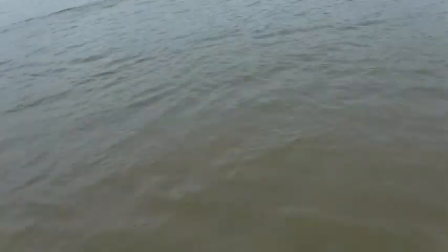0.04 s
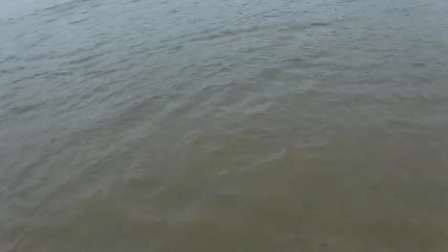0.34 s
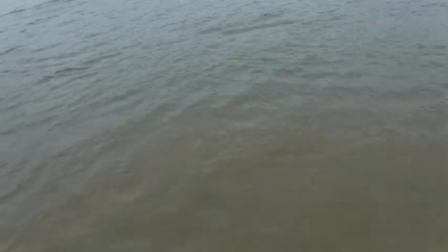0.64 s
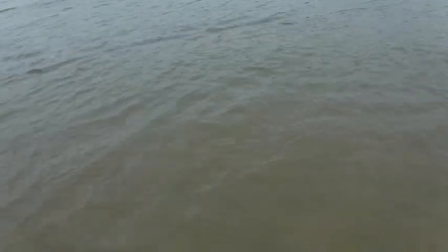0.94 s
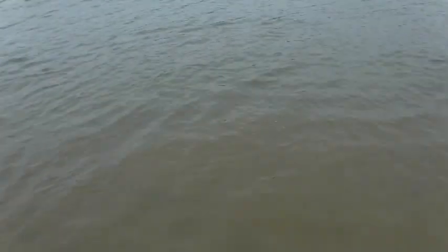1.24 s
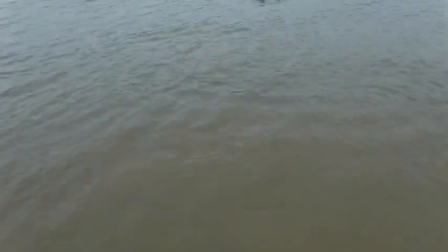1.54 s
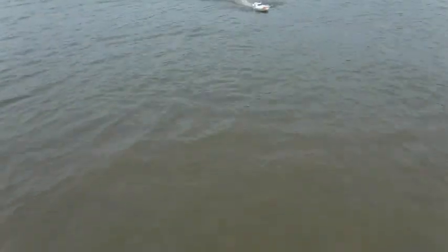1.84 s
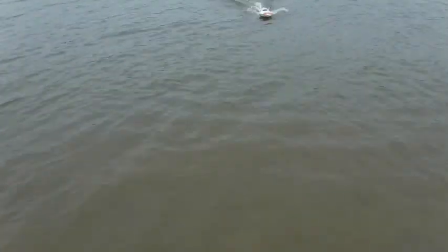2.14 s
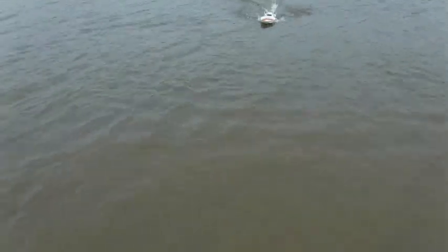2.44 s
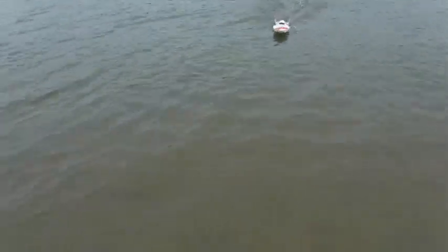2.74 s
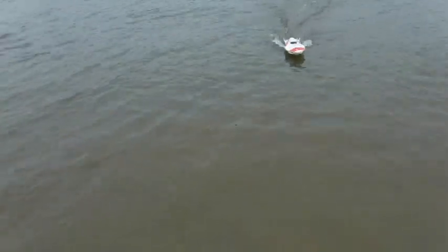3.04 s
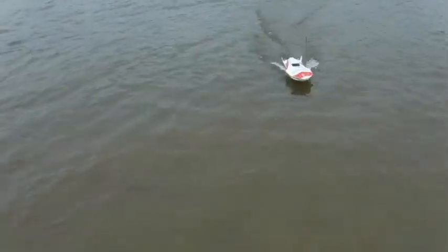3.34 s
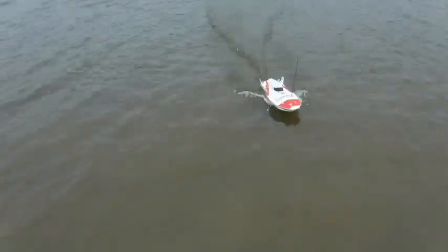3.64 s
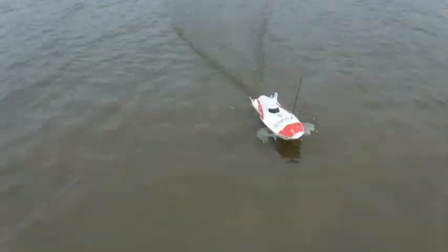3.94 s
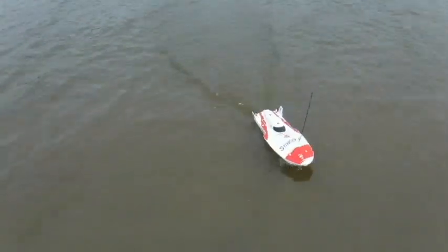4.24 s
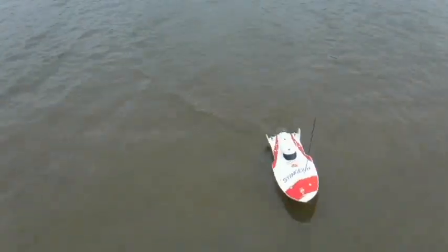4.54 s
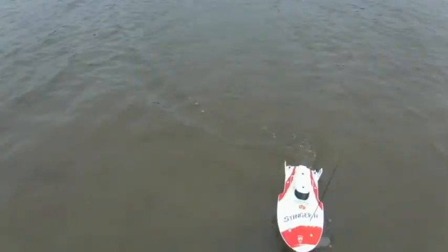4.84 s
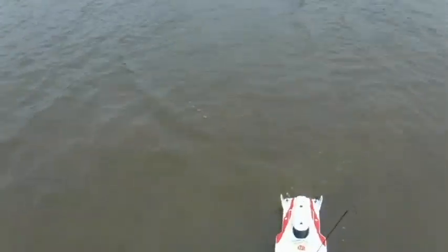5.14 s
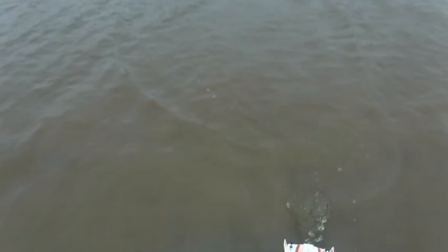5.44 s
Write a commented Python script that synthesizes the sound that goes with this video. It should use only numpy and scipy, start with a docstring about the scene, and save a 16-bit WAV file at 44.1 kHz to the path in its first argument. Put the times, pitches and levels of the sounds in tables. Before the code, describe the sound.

For the first second, wind rumbles and thumps on the microphone, dying away by about 1.5 seconds. Beneath it a toy electric boat runs in across a lake, its small motor whining at a steady pitch and rattling through the plastic hull. It wavers in loudness and grows gradually nearer, with soft bubbling and a few thin ticks of spray. A sharp, close plastic click comes at 2.2 seconds. At 3.3 seconds the motor cuts out with a brief propeller churn, and the boat coasts among small, distinct drops and a couple of faint clicks. A short throttle burst with rasping gears comes from 4.4 to 4.6 seconds, with another loud plastic click near its end. More drips follow, then a second, raspier burst from 5 to 5.4 seconds. A faint distant rumble and the hiss of ripples continue throughout.

```python
"""Wind buffets the microphone at first, as a toy electric boat runs in across a lake towards the shore.
Its motor whines and rattles through the plastic hull, growing louder, and the bow wave bubbles.
At 2.2 s comes the first of a few close clicks of hard plastic. At 3.3 s the throttle is let go:
the propeller churns, the boat coasts and single drops stand out. Near 4.4 s and 5 s it gets
two short bursts of throttle, and its gears rasp under the load."""
import sys
import numpy as np
from scipy import signal
from scipy.fft import rfft, irfft, next_fast_len
from scipy.io import wavfile
from scipy.ndimage import uniform_filter1d

SR = 44100
rng = np.random.default_rng(int(sys.argv[2]) if len(sys.argv) > 2 else 0)


def transcribe(u):
    """Save the signal u as a 16-bit wav file named by the first command-line argument.

    u: samples, shape (n,) or (channels, n), limited to [-1, 1]; the rate is SR.
    q: integer samples, one column per channel.
    """
    v = np.clip(np.atleast_2d(u).T, -1, 1)
    q = np.round(v * 32767).astype(np.int16)
    wavfile.write(sys.argv[1], SR, q)


N = 242373
T = np.arange(N) / SR
TOP_HZ = 15900
RUN_OFF_S = 3.325  # the throttle is let go, ending the run in

# How fast the shaft turns on the run in. Each row: time in seconds, turns per second.
SPEED = [(0.0, 108.6), (0.17, 110), (1.08, 108.7), (1.27, 110.0), (1.37, 108.4), (1.41, 110.6),
         (1.83, 109.1), (1.85, 108.1), (2.09, 110), (2.32, 109.8), (2.38, 111), (3.3, 111.6)]
# The motor grows as the boat nears and swells as the hull pitches.
# Each row: time in seconds, motor gain in dB, extra treble gain in dB.
APPROACH = [(0.02, -46, -3), (0.12, -42.5, -7.5), (0.17, -48.5, -1), (0.2, -42, -5.5), (0.24, -44.5, -5),
            (0.4, -46.5, 0.5), (0.46, -45.5, -6.5), (0.49, -44, -5.5), (0.64, -46, -1.5), (0.67, -43, -7.5),
            (0.81, -47, -1.5), (1.04, -45, -0.5), (1.06, -43.5, -6.5), (1.22, -40.5, -6),
            (1.28, -44.5, -2.0), (1.37, -42, -2), (1.47, -43, -5.5), (1.56, -40, -5.5), (1.69, -44, -1.5),
            (1.72, -41, -4.5), (1.87, -42, -0.5), (1.97, -42.5, -4), (2.08, -45.0, 0.5), (2.15, -39.5, -4),
            (2.19, -42.5, -3.5), (2.34, -42.5, 0.5), (2.4, -40.5, -3.5), (2.49, -41.5, 1), (2.59, -40.5, 3),
            (2.68, -41.5, -1), (2.73, -38, -0.5), (2.8, -41.5, -1.0), (2.87, -36.5, -6), (2.91, -41, 2),
            (2.94, -37, -5), (3.01, -39.5, 3.5), (3.06, -36.5, -2), (3.09, -39, 2), (3.23, -37, -2),
            (3.3, -35.5, -2.0)]
# Bursts of throttle by the shore. Each row: start and end in seconds, turns per second
# the shaft first aims for, motor gain in dB, extra treble gain in dB.
BURSTS = [(4.369, 4.605, 102.6, -36, 0.5), (5.047, 5.387, 101.5, -36, 2.5)]
# How well the hull gives off each pitch. Each row: frequency in Hz, then gains in dB
# for the far whine, far rattle, close whine and close rattle.
HULL = [(110, -31, -50, -14, -49), (299, -8.5, -50, -9.5, -67), (670, -30, -52, -31.5, -58),
        (1337, -25, -48, -23.5, -40.5), (1795, -11, -34.5, -14.5, -36), (2113, -14.5, -40.5, -20.5, -39),
        (2830, -33, -53.5, -31, -40), (3300, -18, -42.5, -20, -44.5), (3940, -19, -39, -22.5, -42),
        (4430, -20.5, -41, -21.5, -45), (4700, -21.5, -41, -22.5, -40), (5770, -16.5, -39, -19, -43),
        (6360, -25, -51, -21.5, -52), (7910, -37.5, -48, -31.5, -56), (8500, -34, -65.5, -36, -68),
        (11050, -41.5, -60, -42.5, -70), (15500, -64, -84, -68, -87)]


def undb(db):
    """Turn decibels into a number to multiply by."""
    return 10 ** (np.asarray(db) / 20)


def unit(x):
    """Scale a sound to an average power of 1."""
    return x / np.sqrt(np.mean(x ** 2))


def curve(rows, column=1):
    """Join one column of a table with straight lines over time."""
    rows = np.array(rows, float)
    return np.interp(T, rows[:, 0], rows[:, column])


def spectrum(hz, rows, column=1):
    """Look up the gain at these frequencies in a table of Hz and dB."""
    rows = np.array(rows, float)
    return undb(np.interp(np.log(hz + 1e-9), np.log(rows[:, 0]), rows[:, column]))


def colour(x, rows, column=1):
    """Shape a sound's lows and highs with a table of Hz and dB."""
    size = next_fast_len(N)
    gain = spectrum(np.fft.rfftfreq(size, 1 / SR), rows, column)
    return irfft(rfft(x, size) * gain, size)[:N]


def band(x, lo_hz, hi_hz, order=2):
    """Keep the part of a sound between two frequencies."""
    return signal.sosfilt(signal.butter(order, [lo_hz, hi_hz], "band", fs=SR, output="sos"), x)


def walk(per_s):
    """Wander at random, by about 1 either side of zero."""
    points = rng.standard_normal(4096)
    return np.sqrt(3 / 2) * np.interp(T * per_s, np.arange(len(points)), points)


def bump(x, centre, width):
    """A bell shape of height 1."""
    return np.exp(-.5 * ((x - centre) / width) ** 2)


def fade(t, fade_s):
    """Die away by 60 dB every fade_s seconds."""
    return np.exp(-np.log(1000) * t / fade_s)


def add(out, start_s, x, peak_db):
    """Mix in a short sound."""
    i = int(np.clip(start_s * SR, 0, N - 1))
    out[i:i + len(x)] += (undb(peak_db) * x / np.abs(x).max())[:N - i]


def shore(level_db=-47.5):
    """Distant rumble and the even hiss of ripples over open water."""
    # The tone of the open shore. Each row: frequency in Hz, relative level in dB.
    shore_tone = [(15, -41), (30, -3), (60, 4.5), (100, -4), (240, -5), (400, -11.5), (700, -16.5),
                  (970, -16), (2170, -28.5), (3500, -37), (5100, -28), (7000, -32.5), (9000, -35.5),
                  (15500, -37.5)]
    breeze = undb(.6 * walk(5))
    return undb(level_db) * breeze * unit(colour(rng.standard_normal(N), shore_tone))


def wind(die_db_per_s=16, gust_trim_db=-1.5, buffet_trim_db=-2, sputter_db=4.0):
    """Swirls of air rumble, sputter and thump at the microphone, then die away."""
    # The strength of the breeze. Each row: time in seconds, level in dB before the trim.
    gusts = [(0, -34.5), (.22, -25.5), (.29, -33.5), (.38, -26), (.56, -24), (.84, -30.5), (1.08, -32.5),
             (1.26, -47)]
    # The tone of the rumble. Each row: frequency in Hz, relative level in dB.
    wind_tone = [(15, -6), (32, -3), (70, 0), (130, -3), (200, -6.5), (320, -15.5), (500, -28), (900, -45),
                 (3000, -86)]
    # Sharp thumps of air. Each row: time in seconds, level in dB before the trim,
    # upper edge in Hz, half length in seconds.
    buffets = [(0.097, -14.5, 104, 0.0066), (0.25, -17, 270, 0.0021), (0.321, -18.5, 232, 0.004),
               (0.521, -17.5, 365, 0.0084), (0.651, -30.5, 390, 0.0096), (1.005, -34, 490, 0.003),
               (1.643, -37.5, 98.9, 0.023)]
    level_db = curve(gusts) - die_db_per_s * np.maximum(T - gusts[-1][0], 0)
    sputter = rng.standard_normal(N) * undb(sputter_db * walk(60.32))
    swirls = unit(colour(sputter, wind_tone))
    swirls /= np.sqrt(uniform_filter1d(swirls ** 2, size=4000) + 0.037)  # even out slow swells
    out = undb(level_db + gust_trim_db) * swirls
    for s, db, hz, half_s in buffets:
        thump = unit(band(rng.standard_normal(N), hz / 4, hz, order=3))
        out += undb(db + buffet_trim_db) * bump(T, s, half_s) * thump
    return out


def bubble(hz, cycles, glide=0.059):
    """A small air pocket rings briefly and rises in pitch."""
    age = np.arange(int(cycles / hz * SR) + 2) / SR * hz / cycles  # runs from 0 to 1
    ring = np.sin(2 * np.pi * cycles * age * (1 + glide * age / 2))
    return ring * np.exp(-np.log(100) * age) * (1 - np.exp(-age * 25))


def bow_wave(close_spread_db=4, far_spread_db=3, fizz_db=-6):
    """The bow stirs up many tiny bubbles, a fine fizz and a few clear drops."""
    # Water stirred by the hull. Each row: time in seconds, level of the bubbles in dB.
    wash = [(0, -52), (3.0, -53.5), (3.4, -55), (3.58, -55.5), (4.0, -57.5), (4.17, -53), (4.31, -64.5),
            (5.0, -62), (5.5, -46.5)]
    # The clearest drops. Each row: start in seconds, peak level in dB, pitch in Hz.
    clear_drops = [(3.391, -33, 5410), (3.5175, -35, 4720), (3.6253, -38, 5140), (3.674, -53, 898),
                   (3.6933, -35, 3520), (3.749, -39, 5000), (3.815, -41.5, 2560), (3.87, -46, 1100),
                   (3.8927, -40, 2500), (3.9522, -44, 2290), (3.9932, -37, 950), (4.117, -43.5, 2470),
                   (4.174, -45.5, 2120), (4.1966, -44, 2060), (4.228, -36.5, 1970), (4.2566, -34, 6450),
                   (4.741, -41, 1000), (4.77, -44, 1150), (4.86, -47, 2190), (4.896, -43, 1770),
                   (4.9937, -40.5, 5370), (5.023, -42, 1940)]
    bubbles, drops = np.zeros(N), np.zeros(N)
    for when, pitch, size, length in rng.random(size=(4000, 4)):
        s, hz = when * N / SR, 1000 + 6000 * pitch ** 1.3
        spread_db = close_spread_db if s > RUN_OFF_S else far_spread_db  # far bubbles blur together
        size_db = -spread_db * np.log(size + 1 / 50)
        add(bubbles, s, bubble(hz, cycles=12 * (.5 + length)), size_db + 6 * np.log10(hz / 1000))
    for s, db, hz in clear_drops:
        add(drops, s, bubble(hz, cycles=24), db)
    spatter = undb(2.5 * walk(40))
    fizz = unit(band(rng.standard_normal(N), 1900, 5400) * spatter)
    return undb(curve(wash)) * (unit(bubbles) + undb(fizz_db) * fizz) + drops


def spray():
    """Spray makes thin ticks, each a short burst of hiss."""
    # Each row: start in seconds, peak level in dB, rough pitch in Hz, fade time in seconds.
    ticks = [(0.591, -33.5, 7540, 0.014), (1.848, -28.5, 6800, 0.067), (2.8682, -24.5, 5624, 0.012),
             (3.209, -20.5, 6450, 0.016)]
    out, t = np.zeros(N), T[:2048]
    for s, db, hz, fade_s in ticks:
        hiss = rng.standard_normal(len(t)) * fade(t, fade_s)
        add(out, s, band(hiss, hz * 0.64, hz * 1.055), db)
    return out


def plastic_clicks(scrape=0.32, low_hz=600):
    """A snap with a very short scrape sets hard plastic ringing."""
    # Clicks close by. Each row: start in seconds, peak level in dB, scrape length in seconds,
    # extra gain in dB for the notes below low_hz.
    clicks = [(2.2186, -4.5, 0.00074, 4), (3.9324, -26.5, 0.00044, -2), (4.2131, -23.5, 0.00025, -1),
              (4.5517, -6.5, 0.0021, -1), (4.9106, -32.5, 0.0022, -4)]
    # The notes the plastic rings with. Each row: pitch in Hz, relative level in dB, fade time in seconds.
    notes = [(366, -17.5, 0.019), (536, -14.5, 0.026), (685, -8.5, 0.021), (940, -11, 0.027),
             (1070, -9, 0.028), (1643, -3.5, 0.013), (2103, -6, 0.015), (2434, -4.5, 0.0065),
             (2916, -4.5, 0.006), (3570, -15, 0.041), (4630, 4.5, 0.0078), (5790, -3.5, 0.012),
             (6000, -2.5, 0.0083), (7020, -9.5, 0.0084), (8020, -12.5, 0.0068), (9980, -22, 0.012)]
    out, t = np.zeros(N), T[:2048]
    for s, db, scrape_s, low_db in clicks:
        ring = 0
        for k, (hz, note_db, fade_s) in enumerate(notes):
            gain = (-1) ** k * undb(note_db + low_db * (hz < low_hz))
            ring += gain * np.sin(2 * np.pi * hz * t) * fade(t, fade_s)
        push = band(scrape * rng.standard_normal(len(t)) * np.exp(-t / scrape_s), 1450, TOP_HZ)
        push[0] += 2  # the snap
        add(out, s, signal.fftconvolve(push, ring)[:len(t)], db)
    return out


def gear_ticks(delay_s=0.3, peak_db=-35, rise_db_per_s=200):
    """The gears tick once for each burst: a short hiss that swells and stops dead."""
    out, t = np.zeros(N), T[:2048]
    for start_s, *_ in BURSTS:
        hiss = rng.standard_normal(len(t)) * undb(rise_db_per_s * t)
        add(out, start_s + delay_s, band(hiss, 1500, 5000), peak_db)
    return out


def propeller_churn(froth_db=-9, far_db=-6):
    """The propeller slips, shaking the hull and frothing, after the run in and as bursts start and end."""
    def slip(s, db, half_s):
        return undb(db) * bump(T, s, half_s)

    def let_go(s, db):
        return slip(s + 0.045, db - 6, half_s=0.021)

    strength = let_go(RUN_OFF_S, APPROACH[-1][1] + far_db)
    for start_s, end_s, _, db, _ in BURSTS:
        strength += slip(start_s + 0.062, db - 2.2, half_s=0.025) + let_go(end_s, db)
    shake = unit(band(rng.standard_normal(N), 170, 420))
    froth = unit(band(rng.standard_normal(N), 870, 1080))
    return strength * (shake + undb(froth_db) * froth)


def gear_rasp(hz, phase, width_hz=270, grit_db=-8, knock=0.37, stray=0.37, flutter_db=2):
    """Gear teeth grate unevenly: a cluster of unsteady tones, and grit that pulses once a turn."""
    # The rasp bends up and down with the effort. Each row: time in seconds, centre in Hz, level in dB.
    effort = [(4.36, 4810, -85), (4.402, 4876, -50), (4.456, 5090, -48), (4.535, 5300, -44),
              (4.575, 5200, -37), (4.605, 4910, -34), (4.64, 4540, -40.5), (4.69, 4500, -57),
              (4.8, 4700, -82), (5.04, 5090, -77), (5.078, 5200, -36), (5.136, 5256, -38.5),
              (5.19, 5300, -37), (5.245, 5220, -30), (5.31, 5180, -32.5), (5.365, 5000, -36.5),
              (5.412, 4950, -39.5), (5.48, 4817, -56)]
    centre_hz = curve(effort)
    cluster = 0
    for k in range(42, 60):
        lag = 2 * np.pi * rng.random() + stray * walk(70)
        gain = bump(k * hz, centre_hz, width_hz) * undb(flutter_db * walk(30))
        cluster += gain * np.cos(k * phase + lag)
    cluster *= np.sqrt(2 * SPEED[0][1] / (np.sqrt(np.pi) * width_hz))  # power near 1 at full speed
    low_pass = signal.butter(3, 1.5 * width_hz, fs=SR, output="sos")
    grain = signal.sosfilt(low_pass, rng.standard_normal((2, N)))
    centre_phase = 2 * np.pi * np.cumsum(centre_hz) / SR
    hiss = grain[0] * np.cos(centre_phase) + grain[1] * np.sin(centre_phase)  # moved up to the centre
    grit = unit(hiss * (1 + knock * np.cos(phase)))
    return undb(curve(effort, column=2)) * (cluster + undb(grit_db) * grit)


def throttle(spin_up_s=.026, coast_s=.27, unload_s=0.0365, attack_s=0.031,
             climb_hz_per_s=11.5, unloaded_db=-4, fade_db_per_s=106):
    """Held, the throttle spins the shaft up fast; let go, the load drops and the shaft runs down."""
    full_hz, level_db, treble_db = curve(SPEED), curve(APPROACH), curve(APPROACH, column=2)
    since_on, since_off = T + 1, np.maximum(T - RUN_OFF_S, 0)  # already running at the start
    for start_s, end_s, hz, db, bright_db in BURSTS:
        now = T > start_s
        since_on[now] = T[now] - start_s
        since_off[now] = np.maximum(T[now] - end_s, 0)
        # As the boat picks up speed the propeller turns more easily.
        full_hz[now] = hz + climb_hz_per_s * (since_on - since_off)[now]
        level_db[now], treble_db[now] = db, bright_db
    spin = 1 - np.exp(-since_on / spin_up_s)
    shaft_hz = full_hz * spin * np.exp(-since_off / coast_s)
    grip = np.exp(-since_off / unload_s)
    load = spin ** 4 * grip
    release_db = unloaded_db * (1 - grip) - fade_db_per_s * since_off
    gain = (1 - np.exp(-since_on / attack_s)) * undb(level_db + release_db)
    return shaft_hz, load, gain, treble_db


def motor_whine(hz, phase, close, load, sway_db=2.7, flutter_db=3.0, scatter=2.65,
                rocking_per_s=6.5, ripples_per_s=22):
    """Tones at multiples of the shaft speed sway as the boat rocks and flutter as ripples slap it."""
    # Tones that stand out or cancel under load. Each row: multiple, far gain in dB, close gain in dB.
    accent_rows = [(2, 2, 0), (4, -3, 4.5), (8, 5.5, 8.5), (14, 4, 1), (15, 4.5, 5), (16, 5.5, 8),
                   (17, -3, -1.5), (18, 7, 8.5), (19, 1.5, 6.5), (21, 5.5, 11), (22, 2.5, 10.5),
                   (32, -0.5, 3.5), (34, 1.5, 1.5), (36, 1.5, 0), (38, 1.5, -4), (42, -2, -15), (43, 0, -8),
                   (46, 5, 0), (48, -7, -1), (49, 1, -2), (50, 2.5, -5), (52, -4, 2.5), (54, -10, -3),
                   (69, 13, 2), (71, 14, 4)]
    # The hull's two strongest resonances wander as it rocks. Each row: centre in Hz, width in Hz,
    # far gain in dB, close gain in dB, wander in Hz.
    resonances = [(1680, 150, 4, 6, 69), (5270, 200, -0.5, 5, 38)]
    accents = {round(k): (far_db, close_db) for k, far_db, close_db in accent_rows}
    step = 64  # samples between loudness updates
    t, hz, close, load = T[::step], hz[::step], close[::step], load[::step]
    peaks = []
    for centre_hz, width_hz, far_db, close_db, wander_hz in resonances:
        peak_hz = centre_hz + wander_hz * walk(rocking_per_s)[::step]
        peaks.append((peak_hz, width_hz, (1 - close) * far_db + close * close_db))
    angle = np.resize(phase % (2 * np.pi), (len(t), step)).astype(np.float32)
    out = np.zeros_like(angle)

    def drift(per_s):
        return np.interp(t * per_s, np.arange(512), rng.standard_normal(512))

    for k in range(1, 135):
        far_db, close_db = accents.get(k, (0, 0))
        if k % 2 == 0 and 32 <= k <= 54:  # the motor pulls twice a turn, lifting even treble tones
            far_db, close_db = far_db + 6, close_db + 7
        tone_hz = k * hz
        far_gain = spectrum(tone_hz, HULL, column=1) * undb(load * far_db)
        close_gain = spectrum(tone_hz, HULL, column=3) * undb(load * close_db)
        gain = (1 - close) * far_gain + close * close_gain
        gain *= undb(sum(db * bump(tone_hz, peak_hz, width_hz) for peak_hz, width_hz, db in peaks))
        gain *= undb(sway_db * drift(rocking_per_s) + flutter_db * drift(ripples_per_s))
        gain *= 1 + .3 * drift(60)  # a fast flicker
        # Low tones arrive more nearly together; high ones scatter over the turn.
        lag = scatter * np.clip(k / 24, 1, 2) * drift(3)
        out += np.float32(gain)[:, None] * np.cos(k * angle + np.float32(lag)[:, None])
    return np.sqrt(2) * out.ravel()[:N]


def motor(wobble=0.00153, close_wobble=0.0015, loose_wobble=0.02955, knock=0.36, loose_whine=.18,
          loose_rattle_db=6, whine_trim_db=-2, treble_hz=2750, treble_trim_db=-0.7):
    """Whine, gear rasp and a rattle once a turn; a loose shaft smears the whine and favours the rattle."""
    # The whine carries best as the bow turns to the shore. Each row: time in seconds, lift in dB.
    bow_turn = [(2.4, 0), (2.9, 1.5), (3.35, 1.5), (3.6, 5)]
    hz, load, gain, treble_db = throttle()
    loose = 1 - load
    close = np.clip(T - 3.4, 0, 1)  # 0 far out, 1 by the shore
    # By the shore the slow hull loads the propeller unevenly, which roughens the whine.
    hz *= 1 + (wobble + close_wobble * close + loose_wobble * loose) * walk(90)
    phase = 2 * np.pi * np.cumsum(hz) / SR
    grit = unit(rng.standard_normal(N) * (1 + knock * np.cos(phase))) * np.sqrt(SR / 2)
    rattle = (1 - close) * colour(grit, HULL, column=2) + close * colour(grit, HULL, column=4)
    whine_gain = undb(curve(bow_turn) + whine_trim_db) * (load + loose_whine * loose)
    sound = whine_gain * motor_whine(hz, phase, close, load) + undb(loose_rattle_db * loose) * rattle
    low = signal.sosfiltfilt(signal.butter(4, treble_hz, fs=SR, output="sos"), sound)
    treble = undb(treble_db + treble_trim_db) * (sound - low)
    return gain * (low + treble) + gear_rasp(hz, phase)


def scene():
    """Boat, water, clicks and wind in the open air, on one channel."""
    boat = motor() + propeller_churn() + bow_wave()
    ticks = plastic_clicks() + spray() + gear_ticks()
    return (boat + ticks + wind() + shore())[None]


def record(dry):
    """Cut away the treble above TOP_HZ."""
    return signal.sosfilt(signal.ellip(10, .1, 80, TOP_HZ, fs=SR, output="sos"), dry)


dry = scene()
out = record(dry)
transcribe(out)
```